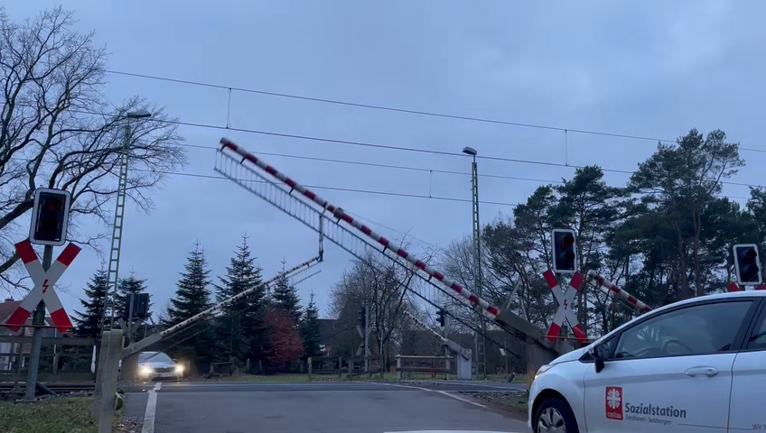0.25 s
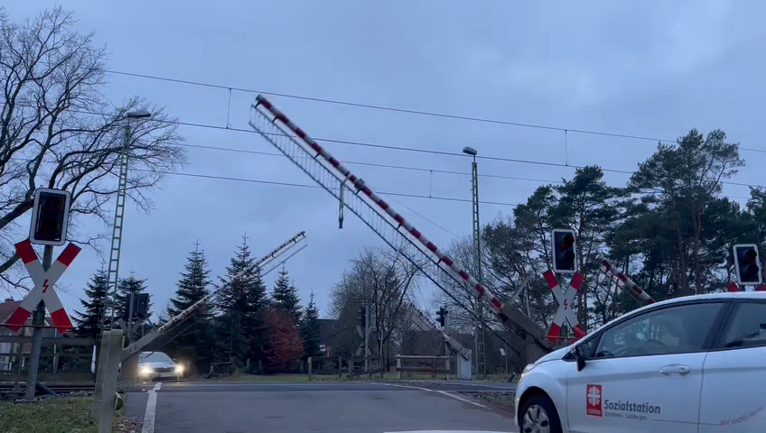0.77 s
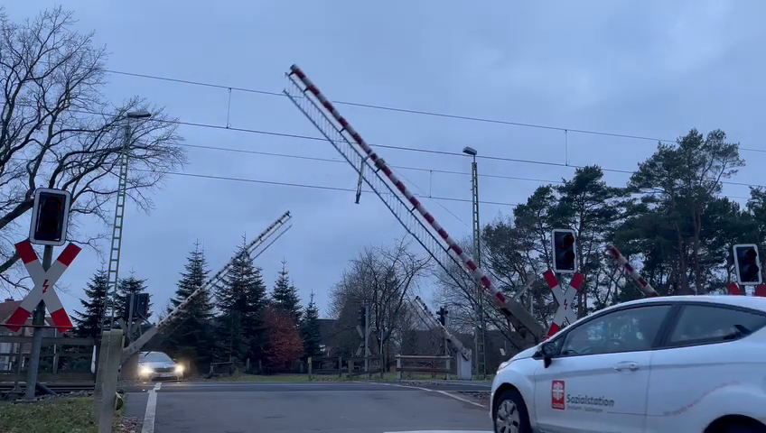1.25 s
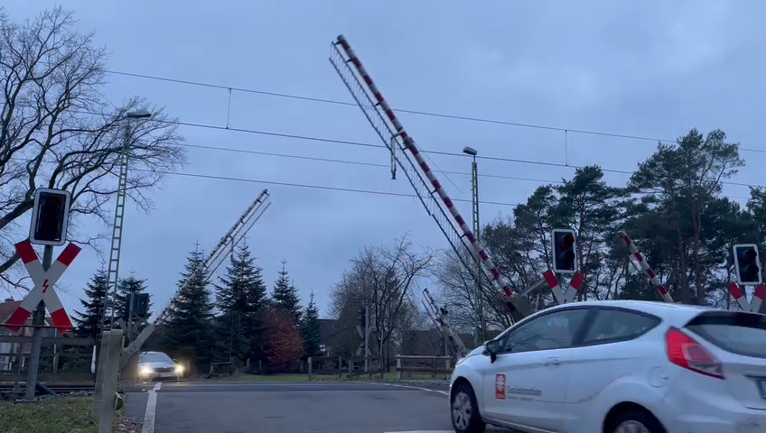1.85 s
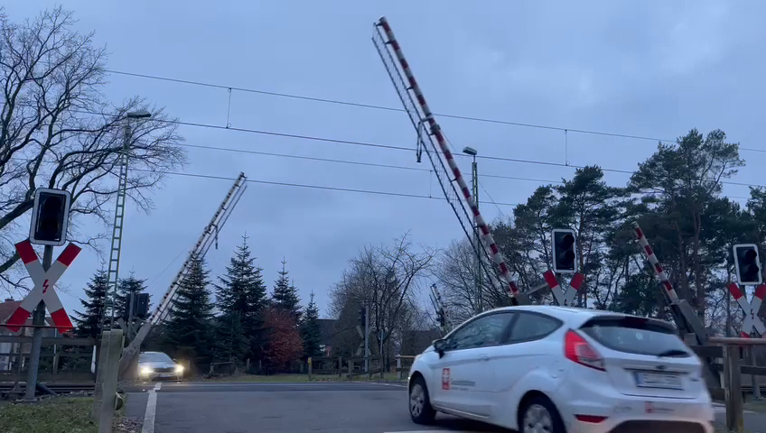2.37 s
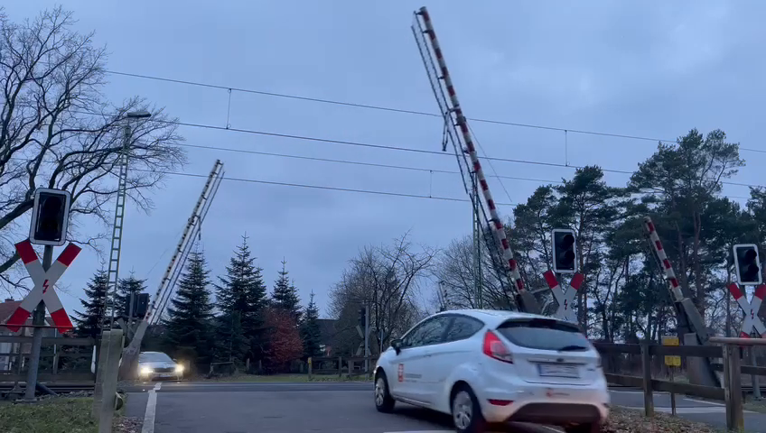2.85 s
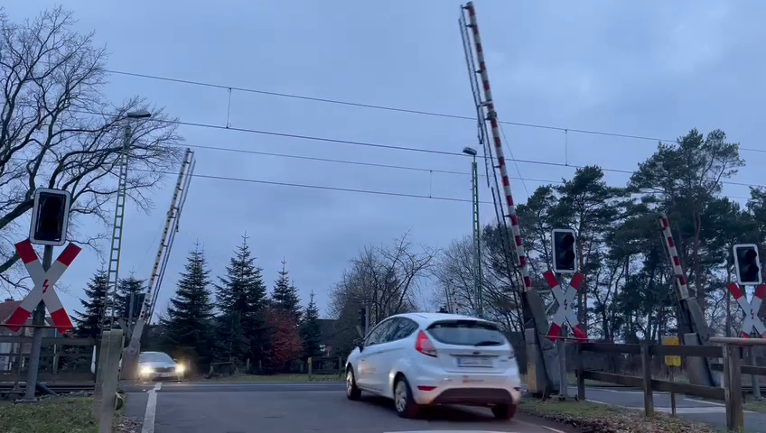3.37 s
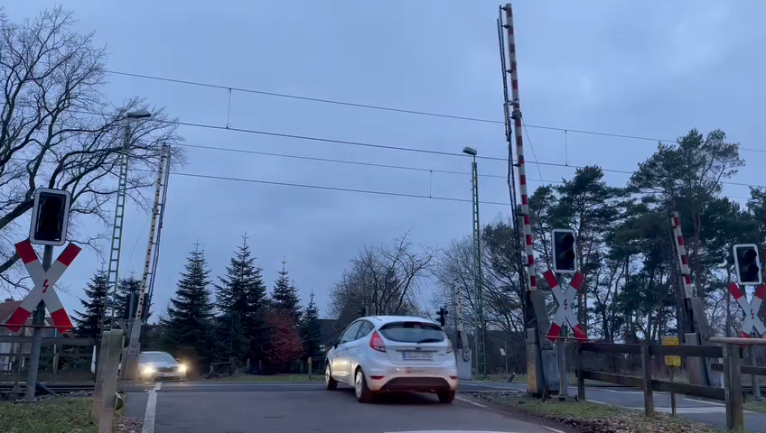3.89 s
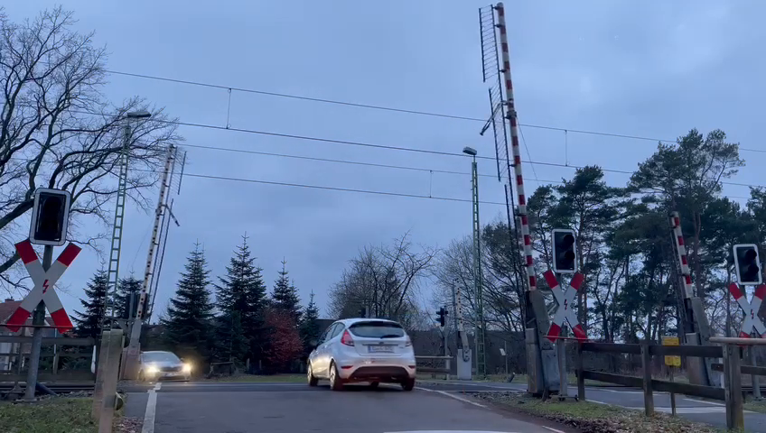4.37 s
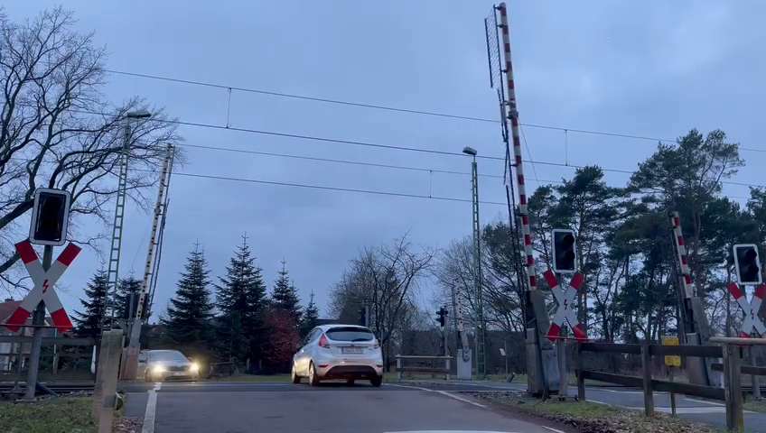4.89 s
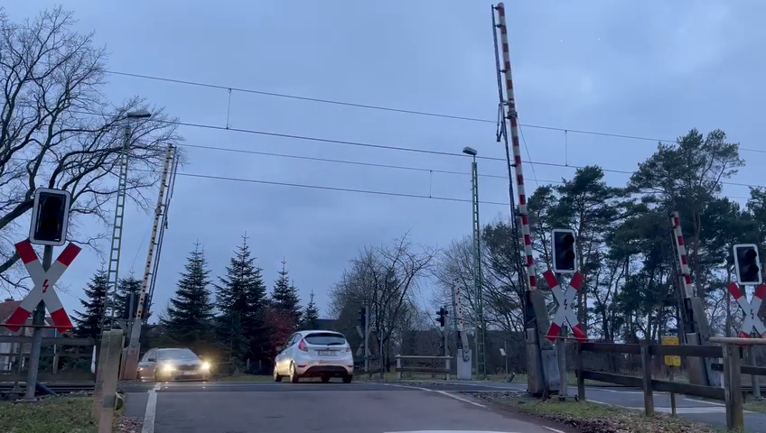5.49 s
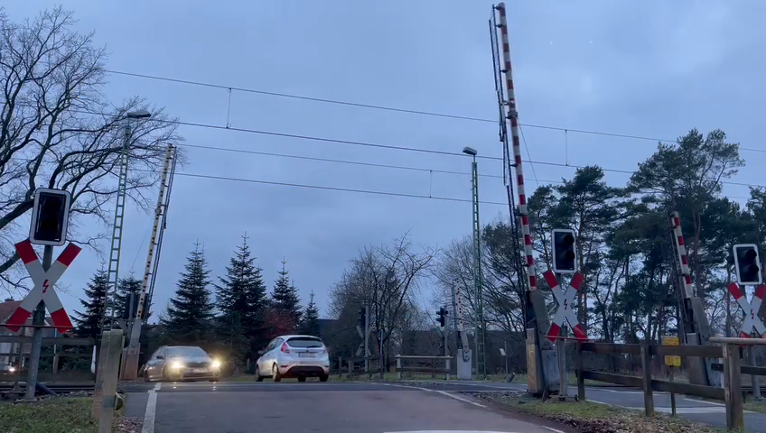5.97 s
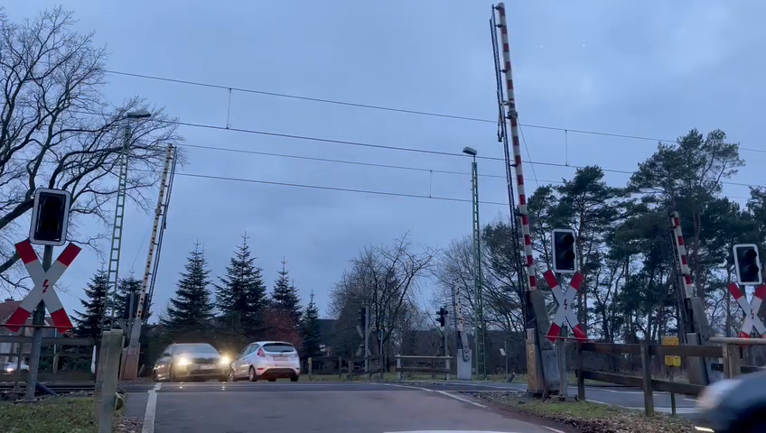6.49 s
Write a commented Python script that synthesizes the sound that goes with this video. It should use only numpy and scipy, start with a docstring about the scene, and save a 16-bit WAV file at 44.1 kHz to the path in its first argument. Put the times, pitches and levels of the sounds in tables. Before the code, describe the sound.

Outdoors at a railway level crossing, a small car labours from near idle, pulls away, eases off, then accelerates into the distance. A barrier motor hums faintly and metal jingles lightly. Wheels bump dully over rails while a sleeve scuffs and creaks close to the handheld stereo microphone. The engine note drops for a gear change, then a rougher, clattering car comes up on the right.

```python
"""A level crossing: the barrier motor hums as the barriers rise, and light metal jingles by the microphone.
A small hatchback pulls away, eases off and speeds up again: engine tones plus shaped noise. A bird chirps.
A sleeve, probably a jacket's, brushes and scuffs close by: grainy noise strokes. Damped rings bump on the rails.
The hatchback changes gear; a second car with a clattering engine comes up from behind on the right."""
import sys
import numpy as np
from scipy import signal
from scipy.fft import rfft, irfft, next_fast_len
from scipy.io import wavfile

SR = 44100
rng = np.random.default_rng(int(sys.argv[2]) if len(sys.argv) > 2 else 0)


def persist_wave(psi):
    """Save psi, clipped to +-1, as 16-bit WAV."""
    counts = np.round(np.clip(psi, -1, 1) * 32767).astype(np.int16)
    wavfile.write(sys.argv[1], SR, np.atleast_2d(counts).T)


N = 296866
TIME = np.arange(N) / SR

# In the noise colours below, level_db is per Hz and relative: the whole noise is then scaled to rms 1.

# Hatchback's engine speed, before a slight wobble: time_s, firing_hz
HATCHBACK_SPEED = [(0, 29.74), (.3, 32.26), (.52, 34.93), (.68, 39), (.8, 43.8), (1.0, 48.4), (1.25, 48.56),
                   (1.5, 47.5), (1.8, 44.8), (2.28, 36.7), (2.48, 42.6), (2.8, 47.68), (3.06, 53.4),
                   (3.62, 63.87), (4.0, 68.5), (4.3, 72.4), (4.5, 69.66)]
# How hard its engine works: time_s, exhaust_db (each tone follows its own share of the swing)
HATCHBACK_EFFORT = [(0, -51), (.25, -43), (.46, -39), (.62, -33.5), (.85, -34), (1.15, -36), (1.65, -40.5),
                    (2.05, -37.5), (2.5, -37.5), (3.1, -35), (3.4, -34.5), (3.9, -38)]
# Its engine tones: multiple (of the firing rate), level_db (relative), effort_share (of the swing)
HATCHBACK_ORDERS = [(1.006, 0.5, 1.3), (1.5, -14, 0.67), (2.002, 0.5, 0.75), (2.57, -15, 0.58),
                    (2.994, 0, 1.55), (4.01, -1.5, 1.35), (5.007, 1.5, 0.13), (5.974, -1.5, 1.2),
                    (6.96, -1.5, .6), (8.11, -5, 0.32), (9.03, -3.5, 0.27), (10.59, -5, .5),
                    (12, -0.5, 0.79), (12.98, -3.5, .5), (15, 0.5, 0.34), (17, -4, 0.34), (17.83, -2, 0.59),
                    (19.95, -3.5, 0.56), (22.52, -2, .5), (31.4, -2.5, 0.62)]
# How well its exhaust pipe passes each pitch: pitch_hz, level_db
EXHAUST_PIPE = [(30, -9), (35, -10), (47, -5), (52, -5.5), (58, -0.5), (65, 0.5), (72, -3), (95, -0.5),
                (112, 2), (125, -2.5), (138, -8.5), (170, -21.5), (192, -10.5), (212, -6.5), (245, -22),
                (272, -13), (340, -25), (420, -11.5), (480, -18.5), (620, -26.5), (900, -21), (1300, -24),
                (2000, -21)]
# Colours of its low rumble, tyre roar and engine-bay hiss: pitch_hz, level_db
RUMBLE_COLOUR = [(22, -12), (35, 2), (55, 13.5), (90, 1), (150, 0.5), (260, -8), (400, -2), (800, -32.5)]
TYRE_COLOUR = [(200, -61), (400, 9), (510, 14), (650, 7.5), (850, 3), (1200, 7.5), (1600, -3), (2600, -45)]
ENGINE_BAY_COLOUR = [(1000, -8), (1650, -0.5), (2050, 2.5), (2350, -0.5), (3200, -7), (4100, -7),
                     (6000, -16.5), (8000, -16.5), (11500, -39)]
# Colour of the body's shudder as the clutch bites: pitch_hz, level_db
SHUDDER_COLOUR = [(45, -12), (62, 15), (85, 4), (120, 8), (170, -9), (260, -3.5), (380, 0), (600, -10),
                  (1500, -33.5)]
GEAR_CHANGE_S, CLUTCH_DB_PER_S = 4.47, 150   # the note drops away as the clutch opens
SMOOTH_ROUGH = 0.15   # usual unevenness of the tones
LABOUR_HZ, LABOUR_ROUGH_PER_HZ = 36.6, 0.06   # below this firing rate the engine labours and runs rough
CRUISE_HZ = 50   # firing rate at which the next levels apply, before the fades
# level (dB) and its rise per doubling of the firing rate (dB)
RUMBLE_DB, RUMBLE_RISE_DB = -39, 1.5
TYRE_DB, TYRE_RISE_DB = -44.5, 6.5
HISS_DB, HISS_RISE_DB = -46.5, 8.5
RUMBLE_EFFORT_SHARE, RUMBLE_FADE_DB_PER_S = 0.45, 2   # share of the swing; fades as the car leaves
RECEDE_S, RECEDE_DB_PER_S = 3.26, 5   # past the barrier, the road noise falls away
BITE_S, BITE_RISE_S, BITE_FALL_S, BITE_DB = 0.52, 0.29, 0.43, -38.5

# Second car's engine speed, before a slight wobble: time_s, firing_hz
FOLLOWER_SPEED = [(4.68, 48.5), (5.0, 55.5), (5.3, 64), (5.52, 70), (5.75, 72.3), (6.05, 70.73),
                  (6.22, 67.7), (6.38, 62.3), (6.73, 59.7)]
# Its firing tone, which booms as the car goes by: time_s, level_db (rms, before it fades in)
FOLLOWER_THROB = [(4.7, -40), (5.15, -43), (5.3, -32.5), (5.53, -30), (5.61, -38), (5.7, -33), (5.79, -38),
                  (5.92, -32.5), (6.2, -27.5), (6.36, -49), (6.73, -40)]
# Its approach: time_s, reference_db (its road noise, clatter and other engine tones are set from this)
FOLLOWER_APPROACH = [(0, -37.5), (3.5, -43), (4.1, -35), (5.1, -31), (5.65, -26.5), (6.5, -27.5),
                     (6.73, -28.5)]
# Its other engine tones: multiple (of the firing rate), level_db (from reference_db)
FOLLOWER_ORDERS = [(1.5, -20.5), (2, -15), (2.75, -18), (4, -17)]
# Colours of its road noise, engine clatter and gritty tread hiss: pitch_hz, level_db
FOLLOWER_ROAD_COLOUR = [(30, -10), (60, -4), (110, 1), (180, -1), (290, -7), (400, -8.5), (700, -10),
                        (1100, -10.5), (1600, -11.5), (3000, -20.5), (11500, -80)]
FOLLOWER_CLATTER_COLOUR = [(600, -3.5), (1250, 0), (1550, 2), (1800, 8), (2300, 9.5), (3000, -3.5),
                           (4200, -8.5), (5400, -0.5), (6400, 4), (7200, -7), (8200, -52), (9300, -40),
                           (11500, -29)]
TREAD_COLOUR = [(600, -5), (1050, -3), (1500, 10.5), (2100, -2), (2850, 7), (3900, -4), (5400, 1),
                (6500, 0), (7700, -12), (9000, -58), (11500, -35)]
# Its direction: time_s, right_ear_lead_ms
FOLLOWER_BEARING = [(4.1, 0.34), (4.6, 0.47), (5.55, 0.44), (5.8, 0.43), (6.05, 0.36), (6.3, 0.31),
                    (6.73, 0.12)]
PULLS_S, PULL_RISE_S = 4.45, 0.34   # its engine tones come in
ABREAST_S, ABREAST_WIDTH_S = 5.62, 0.505   # when it is level with the listener
ROAD_DB, CLATTER_DB, ABREAST_DB = -4.5, -16, 10   # from reference_db; extra clatter when level
TURN_AWAY_DB_PER_S = 0.5   # once past, the body shields the engine bay
BOUNCE_FAR_MS, BOUNCE_NEAR_MS, BOUNCE_GAIN = 0.566, 1.72, 0.21   # its reflection off the road
TREAD_S, TREAD_RISE_S, TREAD_FALL_S, TREAD_DB = 5.83, 0.17, 0.45, -33

# Sleeve slides: peak_s, peak_db, fall_s, body_db (from the peak)
SLEEVE_STROKES = [(3.519, -47.5, 0.15, -15), (3.92, -24.5, 0.063, -4), (4.24, -35, 0.37, -3.5),
                  (4.43, -33, 0.073, -3), (4.66, -33, 0.076, 0.5), (4.742, -21.5, 0.07, -5.5),
                  (4.795, -28.5, 0.057, 1.5), (4.985, -26.5, 0.11, -4.5), (5.28, -30, 0.05, -8),
                  (6.123, -31.5, 0.043, -20.5), (6.56, -38.5, 0.088, -16)]
# Sleeve catches and snaps free: peak_s, peak_db, fall_s, body_db (from the peak), creak_hz,
# creak_db (from the peak)
SLEEVE_CATCHES = [(3.864, -32.5, 0.0052, 1, 2500, -4), (3.88, -27, 0.0054, -13, 6670, -3),
                  (3.902, -25, 0.015, -18, 3780, -13), (3.92, -26, .004, -14, 3300, -4),
                  (3.942, -32, 0.0034, -12, 3200, 3), (4.226, -45, .005, -6, 3600, 1),
                  (4.287, -32.5, .009, -8.5, 4500, -7), (4.418, -34, .008, 1, 4400, 1),
                  (4.651, -33, 0.011, -5, 2360, 2), (4.747, -21, 0.01, -1, 3520, -1),
                  (4.79, -26.5, 0.007, -3, 1160, -6), (4.834, -35.5, 0.028, 5, 745, -0.5),
                  (4.912, -24, .005, -8, 7840, 0), (4.916, -22.5, 0.044, -11, 5850, -9),
                  (4.923, -29, .025, -8, 3250, -1), (4.937, -27, 0.02, -22, 2520, 1),
                  (5.054, -21.5, 0.024, 0, 3230, -6), (5.071, -29, 0.021, 1.5, 4050, -3),
                  (5.257, -30, 0.046, -11, 3280, -3), (5.559, -42.5, 0.018, -23, 9900, 2.5)]
# Light rubbing between strokes: time_s, level_db
LIGHT_RUBBING = [(3.8, -90), (3.89, -34.5), (4.58, -48.5), (4.85, -33), (5.45, -44.5), (6.3, -43.5),
                 (6.73, -49.5)]
# Colours of the cloth's swish and of the hollow case under it: pitch_hz, level_db
CLOTH_COLOUR = [(500, -27), (1500, -3), (2400, 1.5), (3300, 1.5), (5500, 0.5), (6700, 0), (8000, 0),
                (10000, -2.5), (11500, 0), (13000, -63)]
CASE_BODY_COLOUR = [(150, -3), (350, 3.5), (700, 1), (1000, -1.5), (1900, 0), (3000, -11)]
# Rings of the rubbed case, low and high: pitch_hz, width_hz, level_db
CASE_LOW_RINGS = [(654, 26, -17), (730, 56, 0.5), (1141, 46, -2), (1366, 12, -14)]
CASE_HIGH_RINGS = [(2450, 24, -3), (2890, 32, -1.5), (3110, 31, -3), (3320, 37, 1.5), (3760, 85, -3),
                   (4030, 90, -1), (4470, 53, -0.5), (4880, 52, -2), (5550, 20, 0), (5880, 33, -1),
                   (8150, 100, 4), (10240, 92, -4)]
# Side the sleeve leans to: pitch_hz, left_minus_right_db
SLEEVE_SIDE = [(600, -1.5), (2000, 0), (3300, 1), (5300, 4), (7500, -0.5)]
RISE_SHARE = 0.48   # a slide's rise time as a share of its fall time
CATCH_RISE_S, CREAK_WIDTH_HZ = 0.0025, 340

# Touches of a small metal part, perhaps the zip pull: peak_s, peak_db
ZIP_TOUCHES = [(0.089, -41), (.097, -40), (.105, -46), (.117, -38.5), (0.126, -45), (.134, -43),
               (0.143, -43), (0.169, -45), (.179, -52), (.202, -49), (1.152, -42.5)]
# Rings of that metal: pitch_hz, width_hz, level_db
ZIP_RINGS = [(3870, 300, -7), (4460, 300, 2), (4900, 380, -9), (5500, 275, -3), (6300, 210, -0.5),
             (7200, 93, 6), (9160, 430, 1), (10950, 140, -18)]
JINGLE_FALL_S, TICK_FALL_S, TICK_DB = 0.014, 0.0025, 1   # each touch: a short tick and a longer ring

# Dull wheel bumps on the rails: start_s, level_db, pitch_hz, t60_s (time to fall by 60 dB)
RAIL_BUMPS = [(4.104, -23, 298, 0.041), (4.108, -27, 140, 0.065), (4.445, -32, 330, 0.059),
              (4.41, -28, 206.6, 0.058), (4.44, -23, 88, 0.1), (4.67, -22.5, 159, 0.033),
              (4.98, -26.5, 276, 0.16), (5.015, -25, 89, 0.11)]
# Light clicks: start_s, level_db, pitch_hz, t60_s (time to fall by 60 dB)
LIGHT_CLICKS = [(3.823, -27, 2110, 0.026), (3.832, -37, 2600, 0.031)]

# Barrier motor under load: time_s, pitch_hz (before a slight wobble), level_db (rms)
BARRIER_MOTOR = [(0, 285.5, -53), (.45, 284, -51.5), (1.3, 281.8, -49), (1.8, 283.4, -58.5),
                 (3.5, 283.9, -55.5), (4.2, 284, -66)]
# Its overtones and a gear tone: multiple (of the motor pitch), level_db (added to the motor's)
MOTOR_ORDERS = [(1, -2.5), (1.8, -2), (3, -5), (5, -10.5)]
# Drone of its housing: time_s, level_db (rms)
HOUSING_DRONE = [(0, -45), (1.3, -50), (2.2, -45.5), (3.5, -41), (4.2, -47.5), (4.6, -50)]
# Rings of the housing: pitch_hz, width_hz, level_db (relative)
HOUSING_RINGS = [(261, 8.9, 4.5), (279.5, 11.7, 2.5), (355, 25, -3.5), (512.4, 5.3, 2), (770, 52, -3),
                 (844, 17, -0.5), (940, 19, -7.5), (1051, 26, -0.5), (1419, 41, -7.5)]
# A pulsing rasp, probably the barrier's gears: time_s, pulses_hz (before a slight wobble), level_db (rms)
GEAR_RASP = [(0, 40, -66), (.8, 36, -72), (1.4, 37.3, -51), (1.9, 31, -57.5), (2.3, 33, -53.5),
             (3.0, 40, -63), (3.8, 31, -67)]
GEAR_HZ, GEAR_WIDTH_HZ, GEAR_SHARPNESS = 2014, 180, 0.68

# Bird notes: centre_s, peak_db, pitch_hz (at the centre), half_length_s
BIRD_CHIRPS = [(1.787, -47.5, 4106, 0.02), (1.992, -50, 4250, 0.02), (3.032, -42.5, 4560, 0.0055)]

# How alike left and right are (1 = the same, 0 = unrelated): pitch_hz, likeness
AHEAD_LIKENESS = [(60, 0.87), (130, 0.82), (280, 0.89), (600, 0.074), (1300, 0.84), (2700, 0.89),
                  (5500, 0.54), (8000, 1)]
SIDE_LIKENESS = [(60, 1), (200, 0.46), (600, 0.7), (2200, 0.95), (5500, 0.45), (8000, 0.17)]
CLOTH_LIKENESS = [(200, 0.93), (700, 0.14), (1400, 0.72), (2700, 1), (5500, 0.61), (8000, 1)]
# Faint echoes off the road, posts and car panels: delay_ms, gain
ECHOES = [(3.1, 0.14), (7.3, -0.16), (12.7, 0.13), (21.0, 0.068)]
# The right channel lags in the treble, which spreads it wide: pitch_hz, lag_turns (of a wave)
RIGHT_LAG = [(6500, 0), (7500, .48), (9200, .52), (9900, 1)]
CUTOFF_HZ = 11850


def hatchback():
    """Firing pulses through an exhaust pipe, with rumble, tyre roar and engine hiss that grow with speed."""
    firing_hz, = in_time(HATCHBACK_SPEED)
    effort_db, = in_time(HATCHBACK_EFFORT)
    swing_db = effort_db - effort_db.mean()
    exhaust_db = effort_db.mean() - CLUTCH_DB_PER_S * np.maximum(TIME - GEAR_CHANGE_S, 0)
    doublings = np.log2(firing_hz / CRUISE_HZ)
    angle = crank(firing_hz, wobble=0.002)

    rough = SMOOTH_ROUGH + LABOUR_ROUGH_PER_HZ * np.maximum(LABOUR_HZ - firing_hz, 0)
    note = np.zeros(N)
    for multiple, db, effort_share in HATCHBACK_ORDERS:
        pipe_db = at_hz(EXHAUST_PIPE, multiple * firing_hz)
        level_db = exhaust_db + effort_share * swing_db + db + pipe_db
        note += engine_order(angle, multiple, level_db, rough)

    rumble_db = RUMBLE_DB + RUMBLE_RISE_DB * doublings
    rumble_db += RUMBLE_EFFORT_SHARE * swing_db - RUMBLE_FADE_DB_PER_S * TIME
    rumble = from_db(rumble_db) * noise(RUMBLE_COLOUR, AHEAD_LIKENESS)
    rumble *= 1 + 0.4 * np.cos(angle) + 0.12 * np.cos(angle / 2)   # throbs unevenly with the firings
    tyres = from_db(TYRE_DB + TYRE_RISE_DB * doublings) * noise(TYRE_COLOUR, AHEAD_LIKENESS)
    hiss = from_db(HISS_DB + HISS_RISE_DB * doublings) * noise(ENGINE_BAY_COLOUR, AHEAD_LIKENESS)
    hiss *= puffs(angle, sharpness=0.19, scatter_db=0.77)   # ticks with the firings

    bite = from_db(BITE_DB) * swell(BITE_S, BITE_RISE_S, BITE_FALL_S)
    shudder = bite * noise(SHUDDER_COLOUR, AHEAD_LIKENESS)
    distance = from_db(-RECEDE_DB_PER_S * np.maximum(TIME - RECEDE_S, 0))
    road_noise = rumble * pan(-0.13) + reflected(tyres * pan(-2.8) + hiss * pan(-0.071))
    return (note + shudder) * pan(-1.4) + distance * road_noise


def follower():
    """Firing tones, road noise, puffs of clatter and tread hiss; they reach the right ear first."""
    firing_hz, = in_time(FOLLOWER_SPEED)
    throb_db, = in_time(FOLLOWER_THROB)
    reference_db, = in_time(FOLLOWER_APPROACH)
    lead_ms, = in_time(FOLLOWER_BEARING)
    angle = crank(firing_hz, wobble=0.005)
    abreast = 1 / (1 + ((TIME - ABREAST_S) / ABREAST_WIDTH_S) ** 2)

    note = engine_order(angle, 1, throb_db, rough=0.2)
    for multiple, db in FOLLOWER_ORDERS:
        note += engine_order(angle, multiple, reference_db + db, rough=0.42)
    note *= np.clip((TIME - PULLS_S) / PULL_RISE_S, 0, 1)

    road = from_db(reference_db + ROAD_DB) * noise(FOLLOWER_ROAD_COLOUR, SIDE_LIKENESS)
    clatter_db = reference_db + CLATTER_DB + ABREAST_DB * abreast
    clatter_db -= TURN_AWAY_DB_PER_S * np.maximum(TIME - ABREAST_S, 0)
    clatter = from_db(clatter_db) * noise(FOLLOWER_CLATTER_COLOUR, SIDE_LIKENESS)
    clatter *= puffs(angle, sharpness=0.13, scatter_db=2.6)
    grit = colour(fibres(per_s=2500, spread_db=1.5, smooth=0.56), TREAD_COLOUR, SIDE_LIKENESS)
    tread = from_db(TREAD_DB) * swell(TREAD_S, TREAD_RISE_S, TREAD_FALL_S) * grit

    bounced = off_road(clatter * pan(-0.0088) + tread, abreast)
    left, right = note * pan(-0.73) + reflected(road * pan(-3.0) + bounced)
    late_left = np.interp(TIME - lead_ms / 1000, TIME, left)
    return np.array([late_left, right])


def sleeve(judder_db):
    """Cloth catches and slides in short strokes, which also sound the hollow body of the case."""
    strokes = [(s, db, RISE_SHARE * fall, fall, body_db) for s, db, fall, body_db in SLEEVE_STROKES]
    for s, db, fall, body_db, _, _ in SLEEVE_CATCHES:
        strokes.append((s, db, CATCH_RISE_S, fall, body_db))   # catches start abruptly
    rubbing_db, = in_time(LIGHT_RUBBING)
    power = from_db(rubbing_db) ** 2
    body_power = np.zeros(N)
    for s, db, rise, fall, body_db in strokes:
        stroke = from_db(db) * swell(s, rise, fall)
        power += stroke ** 2
        body_power += (stroke * from_db(body_db)) ** 2

    swish = colour(fibres(per_s=1500, spread_db=-1.0, smooth=1.0), CLOTH_COLOUR, CLOTH_LIKENESS)
    swish = rms_one(swish + from_db(1.5) * ringing(swish, CASE_HIGH_RINGS, wander_db=5.5))
    body = noise(CASE_BODY_COLOUR, CLOTH_LIKENESS)
    body = rms_one(body + from_db(4.0) * ringing(body, CASE_LOW_RINGS, wander_db=4.5))
    body *= from_db(-1.0)
    judder = from_db(judder_db * drift(100))
    return (np.sqrt(power) * swish + np.sqrt(body_power) * body) * judder


def creaks():
    """Every catch rings briefly at a pitch of its own: noise through a narrow resonance."""
    slips = rng.standard_normal(N)
    out = np.zeros(N)
    for s, db, fall, _, hz, creak_db in SLEEVE_CATCHES:
        creak = rms_one(resonate(slips, hz, CREAK_WIDTH_HZ))
        out += from_db(db + creak_db) * swell(s, CATCH_RISE_S, fall) * creak
    return out


def zip_pull(rise_s):
    """Light metal touches: each is a tick of noise with a short metal ring."""
    tick = from_db(TICK_DB) * noise(CLOTH_COLOUR, CLOTH_LIKENESS)
    metal = rms_one(ringing(rng.standard_normal(N), ZIP_RINGS, wander_db=2))
    out = np.zeros((2, N))
    for s, db in ZIP_TOUCHES:
        touch = swell(s, rise_s, TICK_FALL_S) * tick + swell(s, rise_s, JINGLE_FALL_S) * metal
        out += from_db(db) * touch
    return out


def knocks(rows, rattle):
    """Each knock is a tone that dies away, with an unsteady level."""
    out = np.zeros(N)
    shake = 1 + rattle * drift(119.8)
    for s, db, hz, t60 in rows:
        age = np.clip(TIME - s, 0, 3 * t60)
        decay = np.exp(-np.log(1000) * age / t60)
        out += from_db(db) * decay * np.sin(2 * np.pi * hz * age)
    return out * shake


def barrier():
    """The motor hums in steady tones, the housing drones through its resonances and the gears rasp in pulses."""
    drone_db, = in_time(HOUSING_DRONE)
    drone = rms_one(ringing(rng.standard_normal(N), HOUSING_RINGS, wander_db=3.5))
    motor_hz, motor_db = in_time(BARRIER_MOTOR)
    angle = crank(motor_hz, wobble=0.0014)
    hum = sum(engine_order(angle, k, motor_db + db, rough=0.29) for k, db in MOTOR_ORDERS)
    pulses_hz, rasp_db = in_time(GEAR_RASP)
    teeth = resonate(rng.standard_normal(N), GEAR_HZ, GEAR_WIDTH_HZ)
    teeth = resonate(teeth, GEAR_HZ, GEAR_WIDTH_HZ)
    pulses = np.exp(GEAR_SHARPNESS * np.cos(crank(pulses_hz, wobble=0.042)))
    rasp = rms_one(teeth * pulses)
    return (from_db(drone_db) * drone + hum + from_db(rasp_db) * rasp) * pan(-0.57)


def bird(glide_hz_per_s):
    """Short, thin notes that rise a little: gliding sine tones in a bell-shaped envelope."""
    out = np.zeros(N)
    for s, db, hz, half in BIRD_CHIRPS:
        near = np.abs(TIME - s) < 3 * half
        age = TIME[near] - s
        phase = 2 * np.pi * (hz + glide_hz_per_s * age / 2) * age
        out[near] += from_db(db) * np.exp(-(age / half) ** 2) * np.sin(phase)
    return out


def crank(rate_hz, wobble):
    """Turning angle of an engine, motor or gear that runs slightly unevenly."""
    return 2 * np.pi * np.cumsum(rate_hz * (1 + wobble * drift(10.4))) / SR


def engine_order(angle, multiple, db, rough):
    """One tone of an engine or motor, from a random starting phase, with a shaky strength."""
    strength = np.sqrt(2) * from_db(db) * (1 + rough * drift(12.0))
    return strength * np.sin(multiple * angle + rng.uniform(0, 2 * np.pi))


def puffs(angle, sharpness, scatter_db):
    """One burst per firing, each of a different strength; rms 1."""
    firing = (angle / (2 * np.pi) + 0.5).astype(int)
    strengths = from_db(scatter_db * rng.standard_normal(size=1024))
    return rms_one(np.exp(sharpness * np.cos(angle)) * strengths[firing])


def fibres(per_s, spread_db, smooth):
    """Many tiny slips of uneven size, coming in clumps, over a smooth hiss."""
    sizes = from_db(spread_db * np.minimum(rng.exponential(1, (2, N)), 4))
    sizes *= rng.choice([-1, 1], (2, N))
    clumps = from_db(3.4 * drift(130))
    slips = sizes * (rng.random((2, N)) < clumps * per_s / SR)
    return rms_one(slips) + smooth * rng.standard_normal((2, N))


def ringing(x, rings, wander_db):
    """What a set of resonances picks out of a sound; each one slowly grows and fades by chance."""
    return sum(from_db(db + wander_db * drift(13.5)) * resonate(x, hz, width) for hz, width, db in rings)


def resonate(x, hz, width_hz):
    """A resonance with gain 1 at its peak."""
    r = np.exp(-np.pi * width_hz / SR)
    feed = np.array([1, 0, -1]) * (1 - r * r) / 2
    return signal.lfilter(feed, [1, -2 * r * np.cos(2 * np.pi * hz / SR), r * r], x)


def reflected(x):
    """Direct sound plus a few short echoes, which ripple its spectrum."""
    out = x.copy()
    for ms, gain in ECHOES:
        lag = round(ms * SR / 1000)
        out[:, lag:] += gain * x[:, :-lag]
    return out


def off_road(pair, nearness):
    """Add the bounce off the road; it comes later as the car draws near, so its ripples sweep."""
    delay_s = (BOUNCE_FAR_MS + (BOUNCE_NEAR_MS - BOUNCE_FAR_MS) * nearness) / 1000
    bounce = np.array([np.interp(TIME - delay_s, TIME, ear) for ear in pair])
    return (pair + BOUNCE_GAIN * bounce) / np.sqrt(1 + BOUNCE_GAIN ** 2)


def noise(spectrum, likeness):
    """Smooth stereo noise of a given colour."""
    return colour(rng.standard_normal((2, N)), spectrum, likeness)


def colour(pair, spectrum, likeness):
    """Turn two unrelated noises into a left and right channel of this colour; rms 1."""
    size, hz = frequency_grid()
    mid, side = rfft(pair, size) * from_db(at_hz(spectrum, hz))
    alike = np.clip(at_hz(likeness, hz), -1, 1)
    both = np.sqrt(1 + alike) * mid + np.sqrt(1 - alike) * side * [[1], [-1]]
    return rms_one(irfft(both, size)[:, :N])


def by_ear(pair, balance):
    """Tilt a stereo sound to the left or right, differently at each frequency."""
    size, hz = frequency_grid()
    tilt = from_db(at_hz(balance, hz) * np.array([[1], [-1]]) / 2)
    return irfft(rfft(pair, size) * tilt, size)[:, :N]


def pan(db):
    """Left and right gains for a left-minus-right level difference."""
    return from_db(np.array([[db], [-db]]) / 2)


def swell(s, rise, fall):
    """An envelope that rises to 1 at time s and dies away."""
    return np.exp(-np.minimum(np.maximum((s - TIME) / rise, (TIME - s) / fall), 20))


def drift(rate_hz):
    """Smooth chance that changes little faster than rate_hz; spread about 1."""
    step = 32   # drawn at every 32nd sample, joined by straight lines
    size = next_fast_len(N // step + 2, True)
    hz = np.arange(size // 2 + 1) * SR / step / size
    slow = irfft(rfft(rng.standard_normal(size)) / (1 + (hz / rate_hz) ** 2), size)
    return np.interp(np.arange(N) / step, np.arange(size), rms_one(slow))


def in_time(rows):
    """Each column of a time curve, at every sample."""
    s, *columns = np.transpose(rows)
    return [np.interp(TIME, s, column) for column in columns]


def at_hz(points, hz):
    """Read a table on a log-frequency axis."""
    known_hz, values = np.transpose(points)
    return np.interp(np.log(hz + 1), np.log(known_hz), values)   # + 1 avoids the log of zero


def frequency_grid():
    """Transform length for the whole sound, and the frequency of each bin."""
    size = next_fast_len(N, True)
    return size, np.arange(size // 2 + 1) * SR / size


def from_db(db):
    """Decibels to gain."""
    return 10 ** (np.asarray(db) / 20)


def rms_one(x):
    """Scale to unit rms."""
    return x / np.sqrt(np.mean(x ** 2) + 1e-20)


def scene():
    """Both cars, the jacket, the rails, the barrier and the bird added together."""
    jacket = by_ear(sleeve(judder_db=0.82) + creaks(), SLEEVE_SIDE) + zip_pull(rise_s=0.001)
    bumps_and_clicks = knocks(RAIL_BUMPS, rattle=0.73) + knocks(LIGHT_CLICKS, rattle=0.35)
    return hatchback() + follower() + jacket + bumps_and_clicks + barrier() + bird(glide_hz_per_s=1600)


def record(dry):
    """The treble is spread wide; the deepest bass and the top are cut."""
    left, right = signal.sosfilt(signal.butter(2, 18, "high", fs=SR, output="sos"), dry)
    size, hz = frequency_grid()
    lag = np.exp(-2j * np.pi * at_hz(RIGHT_LAG, hz))
    right = irfft(rfft(right, size) * lag, size)[:N]
    top_cut = signal.ellip(10, 0.2, 80, CUTOFF_HZ, fs=SR, output="sos")
    return signal.sosfilt(top_cut, [left, right])


dry = scene()
out = record(dry)
persist_wave(out)
```